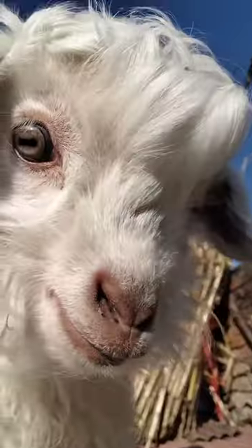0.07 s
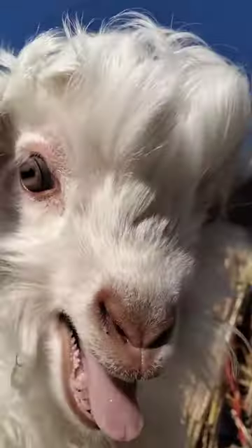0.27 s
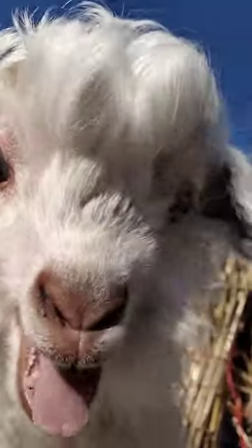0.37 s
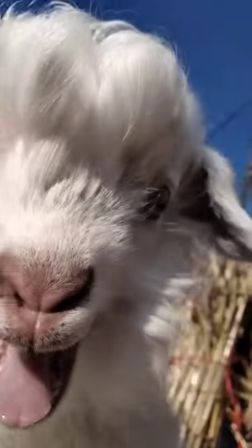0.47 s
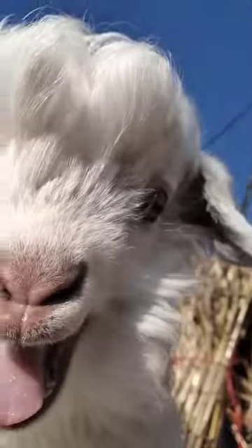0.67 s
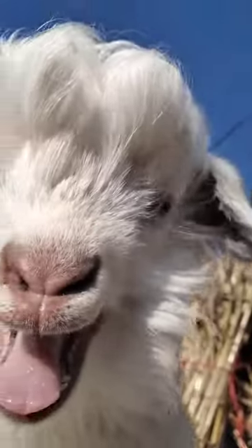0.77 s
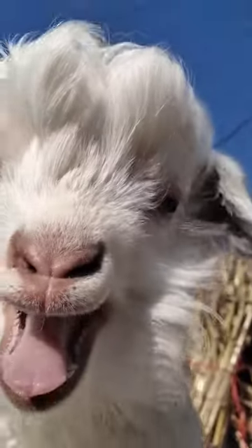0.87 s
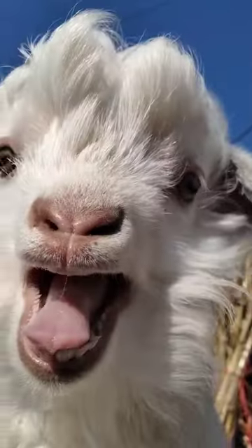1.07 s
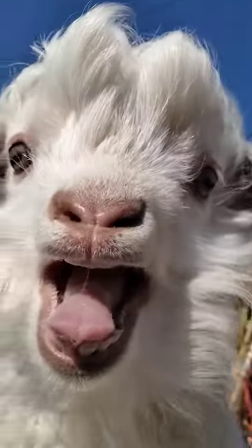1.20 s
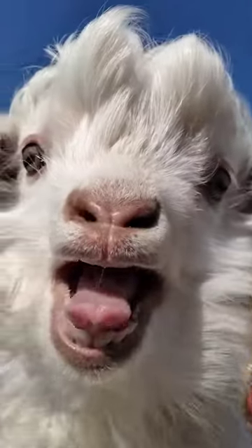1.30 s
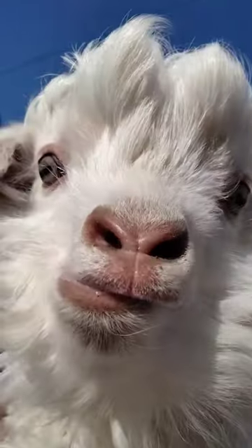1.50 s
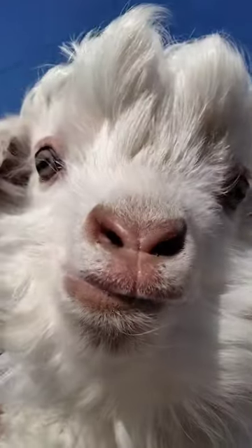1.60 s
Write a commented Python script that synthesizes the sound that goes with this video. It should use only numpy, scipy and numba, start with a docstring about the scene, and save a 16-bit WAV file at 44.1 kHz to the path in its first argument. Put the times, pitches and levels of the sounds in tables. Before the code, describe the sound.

A goat kid gives one loud, long bleat close by outdoors.

```python
"""First comes a very faint outdoor hiss with a distant whir, then a goat kid bleats once, close by.
A creaky rising squeak catches for an instant and breaks, with a crack of air, into a loud, clear note.
The note sags slowly while the tongue goes out and draws back, and it ends in a short rattle.
The voice is made of pulses from the vocal folds and a little air noise, ringing the throat and mouth."""
import sys
import numpy as np
from scipy import signal
from scipy.fft import rfft, irfft
from scipy.io import wavfile
from scipy.ndimage import uniform_filter1d
from numba import njit

SR = 44100
rng = np.random.default_rng(int(sys.argv[2]) if len(sys.argv) > 2 else 0)


def persist_wave(psi):
    """Save psi, clipped to +-1, as 16-bit WAV."""
    counts = np.round(np.clip(psi, -1, 1) * 32767).astype(np.int16)
    wavfile.write(sys.argv[1], SR, np.atleast_2d(counts).T)


N = 72765


def undb(db):
    """Turn decibels into a number to multiply by."""
    return 10 ** (np.asarray(db) / 20)


def curve(rows):
    """Join rows of (seconds, value) with straight lines."""
    return np.interp(np.arange(N) / SR, *np.array(rows, float)[:, :2].T)


def unit(x):
    """Scale a sound to an average power of 1."""
    return x / np.sqrt(np.mean(x ** 2))


def wobble(hz, order=4):
    """Random motion, mostly slower than hz, with a typical size of 1."""
    low_pass = signal.butter(order, hz, "low", fs=SR, output="sos")
    return unit(signal.sosfilt(low_pass, rng.standard_normal(N)))


def colour(x, points, size=1024):
    """Make each frequency louder or softer, following rows of (Hz, dB)."""
    hz, db = np.array(points, float).T
    log_hz = np.log(np.fft.rfftfreq(size, 1 / SR) + 1)
    log_gain = np.log(undb(np.interp(log_hz, np.log(hz), db)))
    # keeping the first half makes the filter ring only after a sound, never before it
    cepstrum = irfft(log_gain)[:size // 2]
    cepstrum[0] /= 2
    ringing = irfft(np.exp(rfft(2 * cepstrum, size)))
    return signal.fftconvolve(x, ringing)[:N]


@njit
def band_pass(x, hz, width):
    """Let through the frequencies around a centre that may move."""
    y, band_state, low_state = np.empty(len(x)), 0., 0.
    for i in range(len(x)):
        tuning, damping = np.tan(np.pi * hz[i] / SR), width / hz[i]
        band = (band_state + tuning * (x[i] - low_state)) / (1 + tuning * (tuning + damping))
        band_state = 2 * band - band_state
        low_state += 2 * tuning * band
        y[i] = damping * band
    return y


def ring(x, hz, width):
    """Make a sound ring around hz by band-passing it twice."""
    centre = hz * np.ones(N)
    return band_pass(band_pass(x, centre, float(width)), centre, float(width))


def at_level(x, rows):
    """Make loudness follow rows of (seconds, dB), with silence before and after."""
    t = np.arange(N) / SR
    power = uniform_filter1d(uniform_filter1d(x ** 2, size=600), size=600)
    sounding = (t > rows[0][0]) * (t < rows[-1][0])
    return x / np.sqrt(np.abs(power) + 1e-12) * undb(curve(rows)) * sounding


# The tone of the outdoor hiss. Each row: frequency in Hz, boost or cut in dB.
HISS_COLOUR = [(80, -22), (170, -10.5), (280, -8), (600, -12.5), (1100, -11), (1600, -15), (2000, -6.5),
               (2600, -24), (3500, -14.5), (5500, -26), (7500, -15), (10000, -23.5), (15500, -31)]
# Low rumbles that join as the call ends. Each row: frequency in Hz, width in Hz, level in dB.
LATE_RUMBLES = [(58, 45, -56.5), (116, 45, -70), (184.5, 22, -64)]
# The whir fades as the call starts. Each row: time in seconds, share of full strength.
WHIR_FADE = [(.08, 1), (.2, 0)]

def background():
    """Faint outdoor hiss and a distant whir lie over a deep rumble, which thickens as the call ends."""
    t = np.arange(N) / SR
    hiss = unit(colour(rng.standard_normal(N), HISS_COLOUR)) * undb(-61 + 0.7 * wobble(hz=11))
    deep_rumble = undb(-62) * wobble(hz=34, order=5)
    late_rumble = sum(undb(db) * unit(ring(rng.standard_normal(N), hz, width))
                      for hz, width, db in LATE_RUMBLES)
    late_fade_in = np.clip((t - 1.46) / 0.029, 0, 1)
    whir = undb(-56) * unit(ring(rng.standard_normal(N), hz=1570, width=340)) * curve(WHIR_FADE)
    return hiss + deep_rumble + whir + late_rumble * late_fade_in


# The tone of the breath before the mouth shapes it. Each row: frequency in Hz, boost or cut in dB.
BREATH_COLOUR = [(300, -3.5), (1250, -19.5), (1750, 8.5), (2100, -7.5), (2450, -11.5), (3000, -18),
                 (3700, 5), (5000, 5), (6100, 2), (6900, -16.5), (7800, 11), (9500, 2), (11500, -9),
                 (15500, -14)]
TOP_HZ = 15900  # where the overtones stop

def vocal_folds(hz, air_db, rasp=0):
    """Each swing of the vocal folds gives one sharp pulse and a puff of air noise."""
    phase = 2 * np.pi * np.cumsum(hz) / SR
    pulses = np.zeros(N)
    for harmonic in range(1, int(TOP_HZ / hz.min()) + 1):
        live = harmonic * hz < TOP_HZ + hz
        fade_at_top = np.minimum(TOP_HZ / hz[live] + 1 - harmonic, 1)
        pulses[live] += np.cos(harmonic * phase[live]) * fade_at_top
    pulses *= np.sqrt(2 * hz / TOP_HZ)  # equally strong at every pitch
    pulses *= 1 + rasp * np.cos(phase / 2)  # strong and weak pulses take turns
    air = colour(rng.standard_normal(N), BREATH_COLOUR) * (1 + 0.17 * np.cos(phase))
    return pulses + undb(air_db) * unit(air)


# The squeak climbs. Each row: time in seconds, pitch in Hz.
SQUEAK_PITCH = [(.138, 236.2), (.15, 303.4), (.16, 346.6), (.18, 381.4), (.2, 429), (.22, 487),
                (.24, 545.3), (.272, 616)]
# It swells, then catches. Each row: time in seconds, level in dB.
SQUEAK_LEVEL = [(0.137, -85), (.14, -42), (0.148, -38.5), (0.191, -28), (.218, -26.5), (.242, -27.5),
                (0.254, -40), (.27, -44), (.28, -58)]
# The throat's steady tone. Each row: frequency in Hz, boost or cut in dB.
SQUEAK_THROAT = [(300, -44), (1000, -40), (1500, -9.5), (2050, 2), (2700, -1.5), (3200, -16), (4800, -19.5),
                 (5400, -17), (6300, -9), (6750, -24), (8100, -9.5), (8900, -25), (9700, -17.5),
                 (12000, -34), (13800, -24), (15500, -59)]
# The mouth's main ring slides down. Each row: time in seconds, frequency in Hz.
MOUTH_SLIDE = [(.14, 4500), (.185, 4080), (.217, 3880), (.235, 2650), (.247, 2090), (.265, 1640)]

def squeak():
    """Creaky, uneven pulses speed up and ring the mouth, throat and chest until the voice catches."""
    hz = curve(SQUEAK_PITCH) * (1 + .011 * wobble(hz=305.5))
    source = vocal_folds(hz, air_db=-8)
    mouth = undb(3.5) * ring(source, curve(MOUTH_SLIDE), width=1030)
    throat = colour(source, SQUEAK_THROAT)
    chest = undb(-7) * ring(source, hz=440, width=370)
    return at_level(mouth + throat + chest, SQUEAK_LEVEL)


# The crack of air jumps up and dies away. Each row: time in seconds, level in dB.
CRACK_LEVEL = [(0.272, -75), (0.282, -27.5), (.296, -39.5), (0.319, -43.5), (.345, -60.5)]
# Its tone. Each row: frequency in Hz, boost or cut in dB.
CRACK_COLOUR = [(120, -23), (450, 1), (900, -6), (1400, 0), (2500, -8), (5000, -3.5), (6500, 3.5),
                (8200, 3.5), (10000, -0.5), (12000, -23), (15500, -20)]

def air_crack():
    """The vocal folds burst open with a rough crack of air as the held note starts."""
    return at_level(colour(rng.standard_normal(N), CRACK_COLOUR), CRACK_LEVEL)


# The note rises, sags slowly, then drops into a rattle. Each row: time in seconds, pitch in Hz.
RISE_PITCH = [(.28, 617), (.298, 640.6), (.32, 657.6), (.35, 677.4), (.385, 683.3), (.43, 688)]
HELD_PITCH = [(.47, 684.5), (.56, 682), (.63, 684.7), (.7, 678.1), (.76, 672.3), (.82, 667.9), (.88, 671),
              (.98, 667), (1.06, 659.7), (1.16, 656.7), (1.24, 655), (1.31, 650.2)]
RATTLE_PITCH = [(1.335, 642.4), (1.362, 611.2), (1.385, 589.2), (1.4, 562.7), (1.412, 459.8),
                (1.422, 369.8), (1.43, 251), (1.438, 138)]
# How loud the note is. Each row: time in seconds, level in dB.
NOTE_LEVEL = [(.27, -94), (0.277, -36), (0.291, -16.5), (0.301, -18.5), (.315, -14), (.47, -14),
              (.77, -17.5), (1, -16.8), (1.33, -17.5), (1.378, -18.5), (1.4, -28), (1.422, -30.5),
              (1.436, -39), (1.447, -42), (1.462, -52.5), (1.485, -86)]
# How breathy it is. Each row: time in seconds, air noise in dB compared with the pulses.
BREATHINESS = [(.28, -13), (.3, -20), (.34, -30), (.42, -34), (.55, -38), (.7, -41), (.8, -33), (.97, -32),
               (1.06, -44), (1.31, -43), (1.37, -18), (1.41, -7), (1.44, -4), (1.45, 8)]
# How unevenly the folds swing. Each row: time in seconds, random wobble as a share of the pitch.
UNEVENNESS = [(.28, .02), (.33, 0.0016), (.45, .001), (1.32, 0.00088), (1.37, 0.0035), (1.42, .03)]
# A slight rasp. Each row: time in seconds, share by which pulses turn stronger and weaker.
RASP = [(.3, 0.01), (.4, .006), (.5, 0.027), (.62, 0.0022), (.9, 0.0094), (1.1, 0.0016), (1.35, 0.0045)]
# The tone of five mouth shapes. Each row: frequency in Hz, boost or cut in dB.
MOUTH_OPENING = [(300, -50.5), (640, -24.5), (1300, -18.5), (1950, 0.5), (2600, -7.5), (3250, -5.5),
                 (3950, 0.5), (4550, -5.5), (5200, -17.5), (6300, -10.5), (6900, -37), (7600, -11),
                 (9000, -47.5), (10200, -29), (12000, -69), (15500, -47.5)]
MOUTH_WIDE = [(400, -25), (680, -28), (1370, -23.5), (2050, 4.5), (2400, -19.5), (2730, -3), (3420, -2.5),
              (4100, -8.5), (4800, -13), (6150, -16), (6850, -22.5), (7500, -7), (8900, -15.5), (9550, -30),
              (10900, -27), (13000, -33), (15500, -53)]
TONGUE_OUT = [(400, -37.5), (680, -27), (1350, -21.5), (2030, 2), (2380, -28), (2700, -7), (3030, -29.5),
              (3390, -1.5), (4070, -10.5), (5400, -9), (6100, -8.5), (6780, -25.5), (7450, -4), (8800, -8),
              (9500, -15.5), (11500, -20), (13000, -29.5), (15500, -44.5)]
TONGUE_BACK = [(400, -23.5), (655, -29), (1310, -26.5), (1970, 2), (2300, -27.5), (2620, -10),
               (2950, -23.5), (3280, -5), (3940, -0.5), (5900, -4.5), (6550, -24), (7250, -6.5),
               (7900, -8.5), (8600, -25), (9200, -30), (9850, -26), (10500, -33.5), (13500, -29.5),
               (15700, -31)]
MOUTH_CLOSING = [(300, -28), (1100, -16), (1850, 6), (3000, -2), (3550, 5.5), (5200, -7.5), (6300, 9.5),
                 (6800, -12.5), (7500, 3.5), (8300, 3), (9000, -12.5), (12000, -28), (15500, -36)]
# When each shape is reached, in seconds. The drawn-back tongue is held, so it has two times.
SHAPE_TIMES = [.315, .44, 0.722, 1.131, 1.342, 1.412]

def bleat():
    """The folds hold a note, clean in the middle and rough at both ends, while the mouth changes shape."""
    flutter = 0.00047 * wobble(hz=45)
    jitter = curve(UNEVENNESS) * wobble(hz=294.5)
    hz = curve([*RISE_PITCH, *HELD_PITCH, *RATTLE_PITCH]) * (1 + flutter + jitter)
    source = vocal_folds(hz, curve(BREATHINESS), curve(RASP))
    source *= 1 + .008 * wobble(hz=150)  # the loudness trembles slightly
    shapes = [MOUTH_OPENING, MOUTH_WIDE, TONGUE_OUT, TONGUE_BACK, TONGUE_BACK, MOUTH_CLOSING]
    voice = np.zeros(N)
    for shape, shares in zip(shapes, np.eye(len(shapes))):
        blend = curve(list(zip(SHAPE_TIMES, shares)))  # 1 at this shape's time, 0 at the others
        voice += blend * colour(source, shape)
    return at_level(voice, NOTE_LEVEL)


def scene():
    """The kid calls over a quiet background, which dips while the note is loud."""
    call = squeak() + air_crack() + bleat()
    dip_db, full_dip_above_db = -9, -22
    dip_share = np.minimum(undb(curve(NOTE_LEVEL) - full_dip_above_db), 1)
    return (call + undb(dip_db * dip_share) * background())[None]


def record(dry):
    """Cut away the treble above TOP_HZ."""
    return signal.sosfilt(signal.ellip(10, .2, 80, TOP_HZ, fs=SR, output="sos"), dry)


dry = scene()
out = record(dry)
persist_wave(out)
```